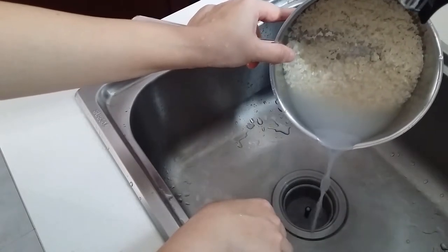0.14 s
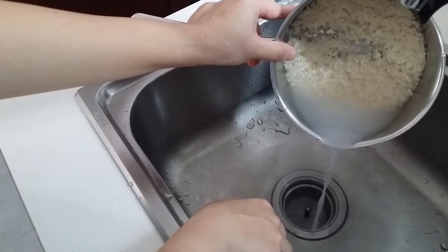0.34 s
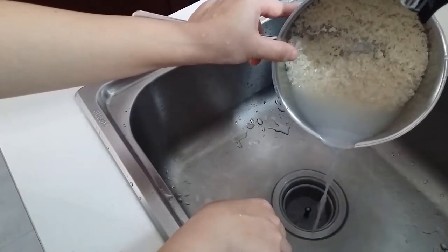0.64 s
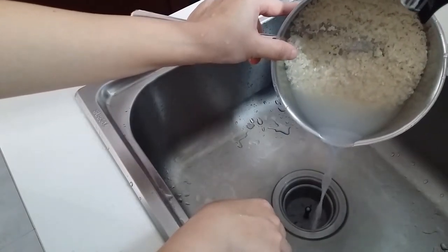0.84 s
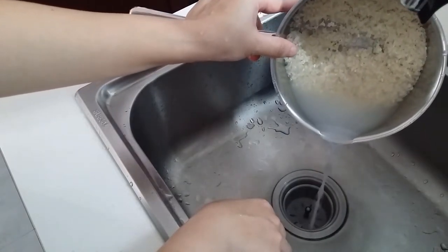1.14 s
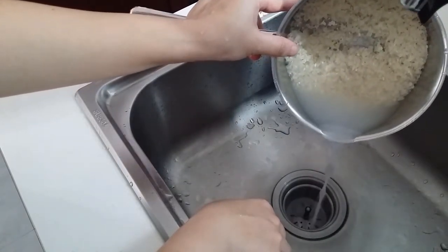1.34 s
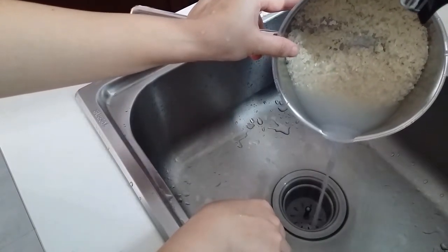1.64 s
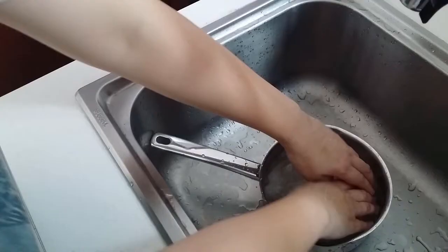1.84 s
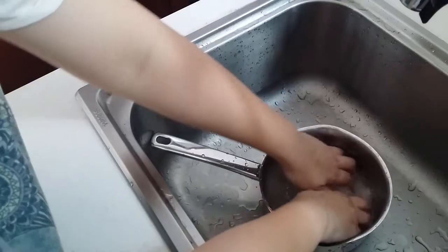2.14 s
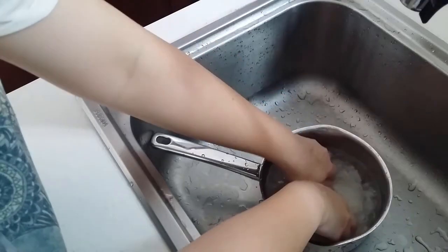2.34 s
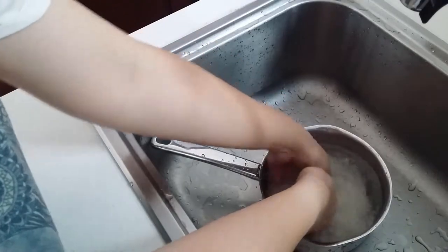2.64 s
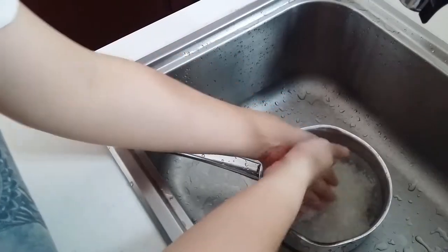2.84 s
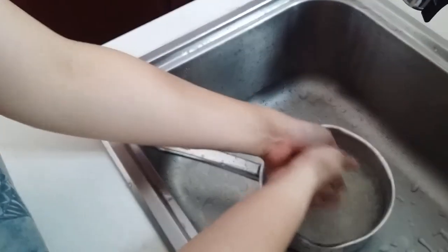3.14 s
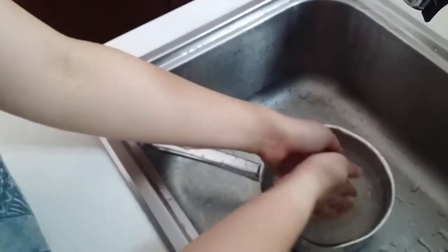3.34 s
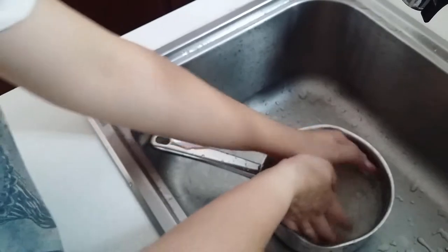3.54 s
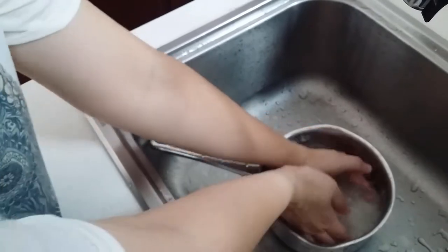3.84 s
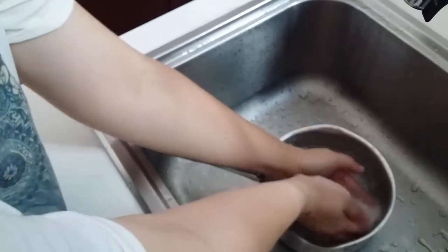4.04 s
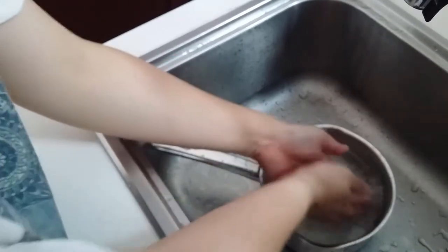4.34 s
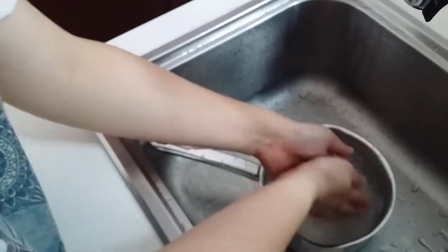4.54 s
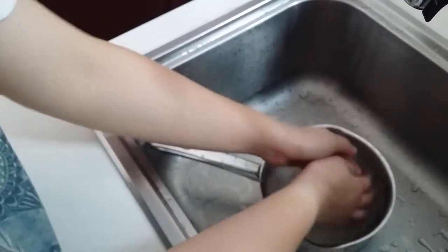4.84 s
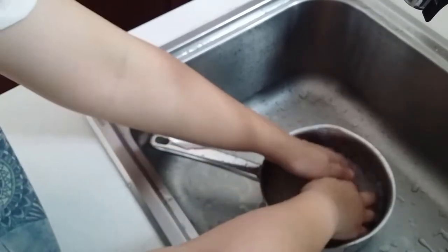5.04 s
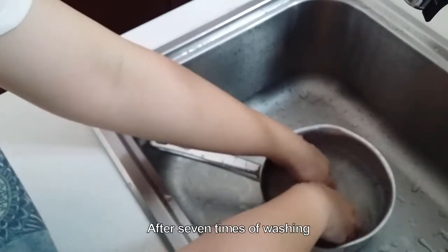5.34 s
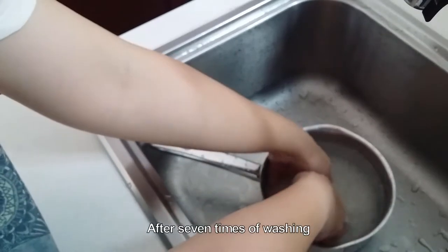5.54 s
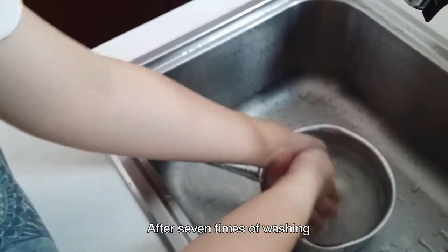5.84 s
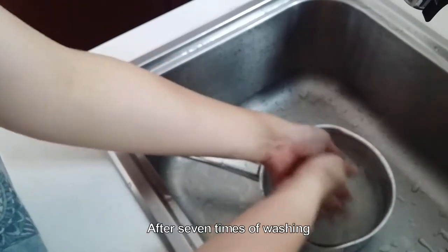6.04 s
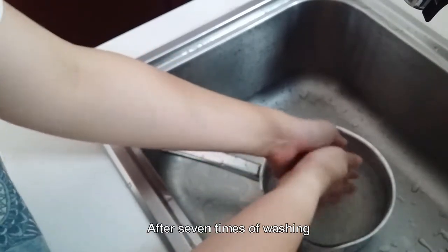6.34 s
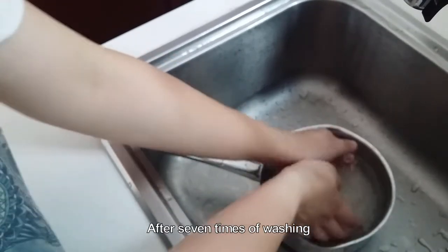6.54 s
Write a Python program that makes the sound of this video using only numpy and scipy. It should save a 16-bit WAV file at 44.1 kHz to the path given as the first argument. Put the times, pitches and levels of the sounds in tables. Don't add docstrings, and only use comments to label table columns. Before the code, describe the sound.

Close in a steel kitchen sink, a thin stream patters into the drain with bright fine spray, sharp little splats, faint gurgles and a few dull knocks. It thins and stops at two seconds. Hands then stir wet rice: soft swishes, a loud run of gritty strokes, metallic ticks and plinks, a lull, then two more bouts. Low fridge-like hum stays underneath.

```python
import sys
import numpy as np
from scipy import signal
from scipy.fft import rfft, irfft, next_fast_len
from scipy.io import wavfile

SR = 44100
rng = np.random.default_rng(int(sys.argv[2]) if len(sys.argv) > 2 else 0)


def dump(signal):
    limited = np.clip(np.atleast_2d(signal).T, -1, 1)
    pcm = np.round(limited * 32767).astype(np.int16)
    wavfile.write(sys.argv[1], SR, pcm)


def decibels_to_gain(level_db):
    exponent = np.asarray(level_db, float) / 20
    return 10 ** exponent


N = 294588

# (time [s], level [dB])
FLOW_DB = [(0.0, -45.5), (0.2, -57.5), (0.34, -53), (0.75, -59.5), (0.83, -56), (0.92, -58.5),
           (1.18, -63.5), (1.21, -95), (1.37, -59), (1.51, -63.5), (1.64, -57), (1.79, -54.5), (1.96, -60),
           (2.2, -99)]
# (frequency [Hz], density [dB per Hz])
SPRAY_SPECTRUM = [(1410, -52), (2400, -3), (3760, 21), (4300, -18.5), (7890, -15.5), (14700, -14.5),
                  (15800, 22)]
# (time [s], top level [dB], half length [s])
GURGLES = [
    (0.0, -72, 0.065),
    (0.31, -75, 0.045),
    (0.67, -68.5, 0.11),
    (1.543, -71.5, .08),
    (1.774, -58.5, 0.12),
]
# (time [s], peak [dB], centre [Hz], T60 [s])
SPLATS = [(0.0656, -37, 7100, 0.078), (0.128, -39.5, 6800, 0.063), (0.1702, -30.5, 8300, 0.056),
          (0.2109, -30.5, 9400, 0.039), (0.2503, -42, 13900, 0.05), (0.2795, -32.5, 7900, 0.091),
          (0.362, -38.5, 10200, 0.047), (0.378, -37, 9600, 0.082), (0.4246, -36, 7630, 0.2),
          (0.5125, -34, 6200, 0.089), (0.614, -31, 7360, 0.053), (0.6878, -34, 11800, 0.075),
          (0.7475, -41, 9900, 0.07), (0.836, -43, 7250, 0.12), (0.8769, -36, 12800, 0.044),
          (0.9014, -43, 13400, 0.038), (0.976, -45.5, 13800, 0.055), (1.059, -28, 12700, 0.035),
          (1.084, -33, 12500, 0.083), (1.1486, -46, 8900, 0.062), (1.2876, -46.5, 12700, 0.098),
          (1.3493, -46.5, 9400, 0.055), (1.4032, -38, 10000, 0.053), (1.4713, -35.5, 9200, 0.064),
          (1.5095, -41, 9900, 0.06), (1.5667, -32, 6600, 0.054), (1.6868, -36.5, 7900, 0.12),
          (1.7519, -36.5, 5870, 0.13), (1.8402, -31, 8900, 0.037), (1.8865, -26.5, 5360, 0.021)]
# (frequency [Hz], width [Hz], level [dB])
PIPE_MODES = [(218, 53, 16.5), (961, 45, 3)]
# (frequency [Hz], density [dB per Hz])
HUM_SPECTRUM = [(12, -48), (20, -4), (27, -41), (48, -6.5), (98, -6.5), (221, -10.5), (254, -7.5),
                (713, -16.5), (969, -22.5), (1690, -22.5), (5320, -29), (6650, -23), (7440, -28.5),
                (14500, -31), (15800, -46)]
# (time [s], level [dB])
HUM_DB = [(0, -67), (1.2, -68.5), (2.2, -68.5), (2.8, -67.5), (3.7, -64.5), (4.1, -72.5), (4.7, -65),
          (5.2, -68), (5.6, -74.5), (6.2, -66.5), (6.68, -67)]
# (frequency [Hz], left-right likeness [-1..1])
HUM_LIKENESS = [(60, .96), (290, .87), (640, .5), (1400, 0), (15000, 0)]
# (frequency [Hz], left minus right [dB])
HUM_TILT = [(60, -4), (250, -3), (600, -1), (5000, 0), (15000, 0)]
# (frequency [Hz], width [Hz], level [dB])
MOTOR_MODES = [(62.4, 11, -6), (146.3, 8.4, -1.5)]
# (time [s], peak [dB], frequency [Hz], pan [dB])
PLINKS = [(0.2135, -47.5, 3060, -13), (0.298, -53.5, 3220, -16), (0.5726, -59, 3206, -20),
          (0.92, -58, 2966, -9), (1.216, -44.5, 3424, -11.5), (1.293, -61, 3400, -14),
          (1.5412, -49.5, 3300, -23), (1.764, -38, 3860, -2), (1.7787, -38.5, 3510, -13),
          (2.388, -61, 1167, -13), (2.796, -52, 3740, -6), (2.8656, -56.5, 2305, 12),
          (3.3976, -21.5, 2588, 2), (3.581, -40, 3053, -7), (3.7219, -60, 3480, -13),
          (3.78, -54, 3700, -10), (4.2043, -57.5, 2960, -7), (4.238, -71, 1317, -15),
          (4.3578, -46, 2630, 10), (4.4063, -40.5, 1523, -10.5), (4.564, -36.5, 3280, -8),
          (5.0943, -61, 3860, 2), (5.9728, -65, 2930, 1), (6.0686, -62, 3230, -3.0), (6.564, -53, 3850, -5),
          (6.581, -41.5, 4100, -5)]
# (time [s], peak [dB], frequency [Hz], T60 [s], pan
# [dB])
PLOPS = [
    (3.1408, -43.5, 2120, 0.069, -13),
    (4.6158, -52, 1820, 0.039, -5),
    (4.7144, -55, 1733, 0.24, -20),
    (4.8, -45.5, 1610, 0.052, -6),
    (4.9352, -45, 1054, 0.03, -10),
    (5.1467, -58, 1560, 0.031, -11),
    (6.1858, -51, 2120, 0.08, -2),
    (6.1984, -51, 1868, 0.2, -13),
    (6.3078, -48.5, 1910, 0.1, -7),
]
# (time [s], peak [dB], frequency [Hz], T60 [s], pan [dB])
KNOCKS = [
    (0.281, -38, 221, 0.093, -8),
    (0.535, -49, 213, 0.14, -3.0),
    (0.991, -39.5, 263, 0.067, -5),
    (1.897, -45.5, 151, 0.14, -2.5),
    (5.718, -59, 110, 0.42, -8),
]
# (time [s], top level [dB], half length [s], slosh of trapped water [rel dB])
STROKES = [(2.24, -62, 0.026, -12), (2.367, -64.5, 0.061, -11), (2.41, -78, 0.015, -10),
           (2.554, -76, .021, -23), (2.81, -60.5, .035, -7), (2.979, -49, 0.034, -9),
           (3.052, -31, 0.031, -18), (3.145, -34.5, 0.032, -9), (3.228, -35, .021, -9),
           (3.308, -30.5, 0.028, -11), (3.398, -33, 0.039, -11), (3.5, -48, .035, -13),
           (3.569, -45.5, 0.026, -25), (3.71, -54.5, 0.017, -10.5), (3.821, -57.5, 0.043, -18),
           (4.491, -55, .04, -25), (4.555, -50, 0.042, -16), (4.645, -33.5, 0.024, -21),
           (4.729, -32.5, 0.015, -23), (4.827, -42.5, 0.032, -18), (4.975, -49, 0.029, -22),
           (5.105, -57.5, 0.02, -20), (5.138, -45.5, 0.012, -24), (6.109, -38, 0.033, -24),
           (6.203, -35.5, 0.03, -17), (6.3, -35, 0.029, -19.5), (6.376, -35.5, 0.023, -17.5),
           (6.602, -49, 0.031, -41)]
# (time [s], level [dB])
PRESS_DB = [(2.0, -77), (2.61, -67.5), (2.94, -66.5), (3.03, -49), (3.28, -49.5), (3.41, -39), (3.75, -69),
            (4.28, -81), (4.42, -66), (4.55, -58.5), (4.81, -39.5), (5.14, -75), (5.31, -81.5),
            (6.06, -72.5), (6.2, -50), (6.36, -52), (6.52, -55), (6.68, -73)]
# (frequency [Hz], density [dB per Hz])
RICE_SPECTRUM = [(530, -64), (900, -26), (1010, -10.5), (1290, -14.5), (2550, 5.5), (2950, -13), (3290, -4),
                 (5770, -0.5), (14200, -19.5), (15800, -19)]
# (frequency [Hz], width [Hz], level [dB])
POT_MODES = [(2550, 68, -11), (3255, 250, 2.5), (4010, 100, -4), (4710, 320, -31), (5900, 74, -3.5),
             (6596, 32, 9)]
# (time [s], peak [dB], centre [Hz], T60 [s])
TICKS = [(2.205, -56, 5770, 0.064), (2.408, -42, 7300, 0.023), (2.5164, -41, 13100, 0.02),
         (2.9427, -36, 3480, 0.18), (2.9644, -50, 7100, 0.04), (3.024, -21.5, 3250, 0.11),
         (3.0319, -32, 5900, 0.069), (3.0485, -24, 4010, 0.03), (3.0604, -17, 6240, 0.041),
         (3.1361, -22, 5800, 0.08), (3.6774, -34, 6700, 0.045), (3.691, -27, 6300, 0.019),
         (3.7229, -35, 5670, 0.04), (3.8033, -23.5, 3850, 0.035), (3.815, -30.5, 4660, 0.074),
         (4.315, -53.5, 6400, 0.036), (4.454, -38, 5050, 0.031), (4.6079, -29.5, 3670, 0.049),
         (4.7068, -25.5, 3880, 0.038), (4.9366, -15, 4010, 0.023), (4.9869, -24.5, 5630, 0.017),
         (5.1286, -45, 3900, 0.04), (5.138, -49, 4520, 0.046), (5.244, -50, 6400, 0.028),
         (5.3203, -54, 4970, 0.045), (5.598, -58, 6130, 0.031), (6.0547, -36, 7900, 0.089),
         (6.1764, -32, 3930, 0.04), (6.347, -21.5, 3750, 0.045), (6.6034, -28.5, 4200, 0.026)]
# (time [s], level [dB])
SCUFF_DB = [
    (5.66, -82),
    (5.744, -62.5),
    (5.92, -77),
]
# (frequency [Hz], width [Hz], level [dB])
SCUFF_MODES = [(103, 22, -4.5), (322, 8.9, -2.5), (591, 8.2, -8.5), (1565, 42, -20), (1984, 56, -17.5)]


def rms_one(x):
    return x / np.sqrt(np.mean(x ** 2) + 1e-20)


def in_time(rows):
    time_s, *columns = np.transpose(rows)
    t = np.arange(N) / SR
    return np.array([np.interp(t, time_s, column, left=-150, right=-150) for column in columns])


def at_hz(points, hz):
    point_hz, value = np.transpose(points)
    return np.interp(np.log(hz), np.log(point_hz), value)


def pan(db):
    return decibels_to_gain(np.array([[db / 2], [-db / 2]]))


def drift(rate_hz):
    r = np.exp(-80 * np.pi * rate_hz / SR)
    chance = rng.standard_normal(N // 40 + 2002)
    slow = signal.lfilter([1], [1, -2 * r, r * r], chance)[2000:]
    return np.interp(np.arange(N) / 40, np.arange(len(slow)), rms_one(slow))


def resonance(x, hz, width_hz):
    r = np.exp(-np.pi * width_hz / SR)
    poles = [1, -2 * r * np.cos(2 * np.pi * hz / SR), r * r]
    return signal.lfilter([(1 - r * r) / 2, 0, (r * r - 1) / 2], poles, x)


def add_swell(power, s, db, rise_s, fall_s):
    near = slice(max(round((s - 0.3) * SR), 0), min(round((s + 0.3) * SR), N))
    late_s = np.arange(near.start, near.stop) / SR - s
    bell = (late_s / np.where(late_s < 0, rise_s, fall_s)) ** 2
    power[..., near] += decibels_to_gain(2 * (db - 9.7 * bell))


def clicks(per_s, spread_db, alike):
    chance = rng.uniform(-1, 1, (3, N))
    marked = abs(chance) < per_s / SR
    size = np.minimum(rng.exponential(1, (3, N))[marked], 3.5)
    train = np.full((3, N), 1e-18)
    train[marked] = np.sign(chance[marked]) * decibels_to_gain(spread_db * size)
    alike = np.clip(alike, 0, 1)
    return np.sqrt(alike) * train[0] + np.sqrt(1 - alike) * train[1:]


def grains(train, span, spectrum, zones_hz, zone_db, cycles, patchy_db, count):
    pitches = np.geomspace(zones_hz[0][0] * 1.1, 15000, count) * decibels_to_gain(rng.normal(0, 0.21, count))
    dealt = rng.integers(0, count, N)
    out = np.zeros((len(zones_hz), 2, N))
    weight = decibels_to_gain(at_hz(spectrum, pitches)) * np.sqrt(pitches)
    zone = np.searchsorted([high for low, high in zones_hz], pitches)
    zone = np.minimum(zone, len(zones_hz) - 1)
    for k, hz in enumerate(pitches):
        mine = train[:, span] * (dealt[span] == k)
        width_hz = np.log(1000) / np.pi * hz / cycles
        zone_power = np.sum(weight[zone == zone[k]] ** 2)
        scale = np.sqrt(np.mean(mine ** 2) * width_hz / SR * zone_power)
        struck = mine * decibels_to_gain((zone_db[zone[k]] + patchy_db * drift(14.4))[span])
        ring = resonance(resonance(struck, hz, width_hz), hz, 2.8 * width_hz)
        out[zone[k]][:, span] += ring * weight[k] / scale
    total = 0
    for (low, high), part in zip(zones_hz, out):
        highpass = signal.butter(6, low, "high", fs=SR, output="sos")
        total = total + signal.sosfilt(highpass, part + 1e-12)
    return 0.52 * total


def with_crack(rows, crack_db, db_per_octave):
    return [(*row, crack_db + db_per_octave * np.log2(row[2] / 8000)) for row in rows]


def bursts(rows, partners, rise_s, crack_s, crack_low, width):
    out, t = np.zeros((2, N + SR)), np.arange(SR // 6) / SR
    for s, db, hz, t60_s, crack_db in rows:
        noise = rng.standard_normal((2, len(t)))
        bands = np.minimum(np.append(hz, partners(hz)), 0.35 * SR)
        body = 0
        for f in bands:
            band = resonance(resonance(noise, f, width * f), f, 2 * width * f)
            body = body + decibels_to_gain(-4.0 * (f != bands[0])) * band
        highpass = signal.butter(2, crack_low * hz, "high", fs=SR, output="sos")
        crack = rms_one(signal.sosfilt(highpass, noise)) * decibels_to_gain(crack_db - 60 * t / crack_s)
        decay = decibels_to_gain(-60 * t / t60_s) + decibels_to_gain(-11 - 18 * t / t60_s)
        puff = rms_one(body) * decay * (1 - np.exp(-t / rise_s))
        out[:, round(s * SR):][:, :len(t)] += decibels_to_gain(db - 11) * (puff + crack)
    return out[:, :N]


def bubbles(rows, climb, rise_s, wobble_rad):
    out, t = np.zeros((2, N + SR)), np.arange(SR // 5) / SR
    for s, db, hz, t60_s, pan_db in rows:
        waver = rms_one(signal.lfilter([1], [1, -1.94, 0.9409], rng.standard_normal((2, len(t)))))
        phase = 2 * np.pi * hz * (t + climb * t ** 2 / t60_s) + wobble_rad * waver
        envelope = decibels_to_gain(db - 60 * t / t60_s) * (1 - np.exp(-t / rise_s))
        out[:, round(s * SR):][:, :len(t)] += envelope * np.sin(phase) * pan(pan_db)
    return out[:, :N]


def body_noise(modes, level_db, lumpy_db):
    noise = rng.standard_normal(N) * decibels_to_gain(lumpy_db * drift(25))
    body = sum(decibels_to_gain(db) / np.sqrt(width) * resonance(noise, hz, width) for hz, width, db in modes)
    return decibels_to_gain(level_db) * rms_one(body)


def spray(gurgle_power):
    coarse_rel_db, coarse_gain_db_per_s = -11.5, 3.5
    (fine_db,) = in_time(FLOW_DB)
    coarse_db = fine_db + coarse_rel_db + coarse_gain_db_per_s * np.arange(N) / SR
    zone_db = [10 * np.log10(gurgle_power), coarse_db, fine_db]
    zones_hz = [(2600, 4200), (4200, 8500), (8500, 15500)]
    contacts = clicks(5000, 4.8, 0.017)
    return grains(contacts, slice(0, round(2.4 * SR)), SPRAY_SPECTRUM, zones_hz, zone_db,
                  cycles=80, patchy_db=5.5, count=30)


def droplets(hz):
    return hz * 2 ** rng.uniform(-0.15, 0.7, 3)


def splats():
    rows = with_crack(SPLATS, crack_db=-8, db_per_octave=8.5)
    return bursts(rows, droplets, 0.00052, crack_s=0.02, crack_low=0.8, width=0.2)


def pour():
    pipe_start_db, sag_db_per_s, stop_s, fade_db_per_s = -63.5, 2, 2.086, 68
    t = np.arange(N) / SR
    fall_db = -sag_db_per_s * t - fade_db_per_s * np.maximum(t - stop_s, 0)
    gurgle_power = decibels_to_gain(2 * (fall_db - 78))
    for s, db, half_s in GURGLES:
        add_swell(gurgle_power, s, db, half_s, half_s)
    pipe = body_noise(PIPE_MODES, pipe_start_db + fall_db, 4.4)
    return (spray(gurgle_power) + splats() + pipe) * pan(-5.0)


def sink(x):
    t60_s, cut_hz, level_db = 0.13, 26000, -13.5
    size = next_fast_len(N + SR)
    w = 2 * np.pi * np.arange(size // 2 + 1) / size
    dull = 1 / np.sqrt(1 + (w * SR / (2 * np.pi * cut_hz)) ** 2)
    response = 0
    for k, lag in enumerate(rng.uniform(0.003, 0.013, (6, 2, 1)) * SR):
        loop = dull * decibels_to_gain(-60 * lag / SR / t60_s) * np.exp(-1j * w * lag)
        response = response + (-1) ** k * loop / (1 - loop)
    return decibels_to_gain(level_db) * irfft(rfft(x, size) * response, size)[:, :N]


def hum():
    out, edges_hz = 0, 22 * 2 ** np.arange(0, 9.6, 0.5)
    white = rng.standard_normal((2, 2, N))
    for k, (low, high) in enumerate(zip(edges_hz, edges_hz[1:])):
        bandpass = signal.butter(2, [low, high], "band", fs=SR, output="sos")
        mid, side = signal.sosfilt(bandpass, white[k % 2])
        hz = np.sqrt(low * high)
        alike = np.clip(at_hz(HUM_LIKENESS, hz), -1, 1)
        gain = decibels_to_gain(at_hz(HUM_SPECTRUM, hz) + 1.3 * drift(3)) * pan(at_hz(HUM_TILT, hz))
        out = out + gain * (np.sqrt(1 + alike) * mid + np.sqrt(1 - alike) * side * [[1], [-1]])
    return decibels_to_gain(in_time(HUM_DB)[0]) * out / np.sqrt(np.mean(out.mean(axis=0) ** 2))


def motor():
    return body_noise(MOTOR_MODES, -76, 0.59) * pan(-4.0)


def drops():
    t60_s, halving_db = 0.065, 28
    plinks = []
    for s, db, hz, pan_db in PLINKS:
        plinks.append((s, db, hz, t60_s * 2 ** (-(db + 50) / halving_db), pan_db))
    return bubbles(plinks + PLOPS, 0.036, 0.0011, wobble_rad=0.67)


def knocks():
    return bubbles(KNOCKS, 0, 0.0062, wobble_rad=0)


def pot_modes(hz):
    modes_hz = [mode[0] for mode in POT_MODES[1:]]
    return rng.choice(modes_hz, 3, replace=False) * decibels_to_gain(rng.normal(0, 0.3, 3))


def ticks():
    rows = with_crack(TICKS, crack_db=-4.5, db_per_octave=4.5)
    return bursts(rows, pot_modes, 0.00055, crack_s=0.037, crack_low=0.39, width=0.054)


def rubbing():
    press_dull_db, press_bright_db, stroke_bright_db = -16.5, -10, -8
    rise, fall = 1.186, 0.79
    power = decibels_to_gain(2 * (in_time(PRESS_DB) + [[press_dull_db], [0], [press_bright_db]]))
    for s, db, half_s, slosh_db in STROKES:
        zone_db = db + np.array([[slosh_db], [0], [stroke_bright_db]])
        add_swell(power, s, zone_db, rise * half_s, fall * half_s)
    zones_hz = [(900, 2700), (2850, 7600), (7000, 15500)]
    contacts = clicks(9000, 2.75, 0.18)
    grind = grains(contacts, slice(round(1.9 * SR), N), RICE_SPECTRUM, zones_hz, 10 * np.log10(power),
                   cycles=40.0, patchy_db=2.5, count=30)
    steel = sum(decibels_to_gain(db) * resonance(grind, hz, width) for hz, width, db in POT_MODES)
    return (grind + decibels_to_gain(-3.5) * steel + ticks()) * pan(-3.2)


def scuff():
    return body_noise(SCUFF_MODES, in_time(SCUFF_DB)[0], 1.7) * pan(-5.0)


def scene():
    water = pour() + rubbing() + drops()
    return water + sink(water) + knocks() + scuff() + hum() + motor()


def top_cut(x):
    return signal.sosfilt(signal.butter(12, 16480, fs=SR, output="sos"), x)


def record(dry):
    cutoff_hz = 15800
    lowpass = signal.cheby2(12, 70, cutoff_hz * 1.035, fs=SR, output="sos")
    return top_cut(signal.sosfilt(lowpass, dry))


dry = scene()
out = record(dry)
dump(out)
```